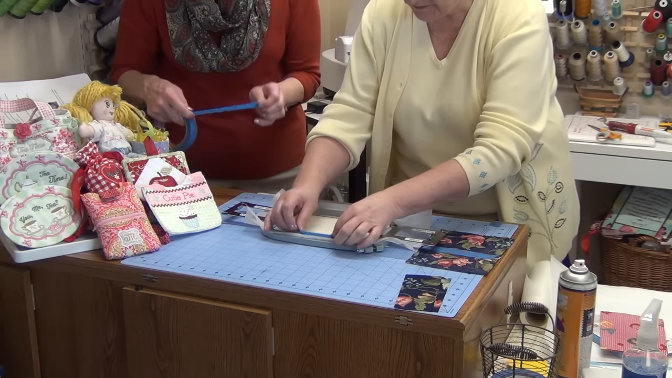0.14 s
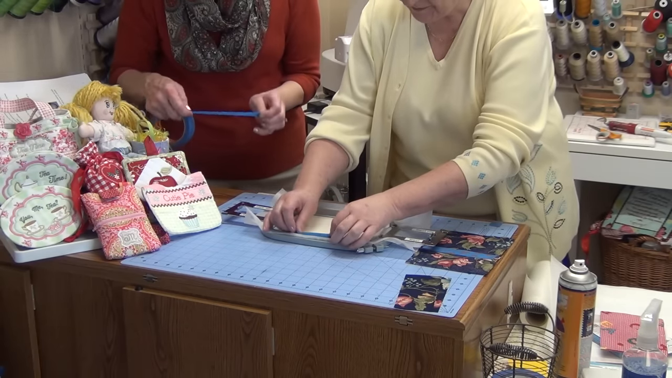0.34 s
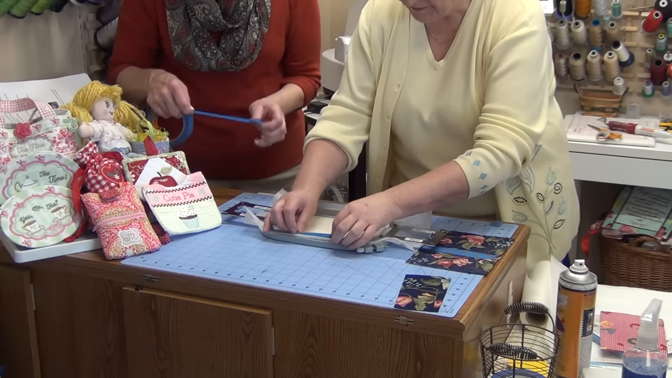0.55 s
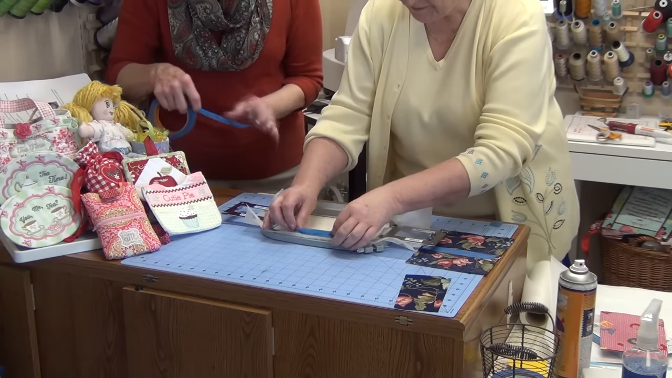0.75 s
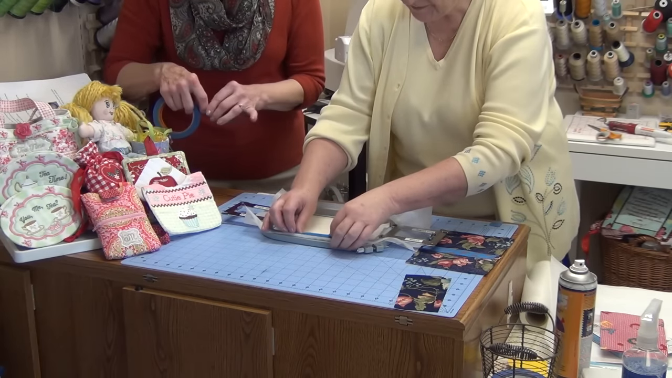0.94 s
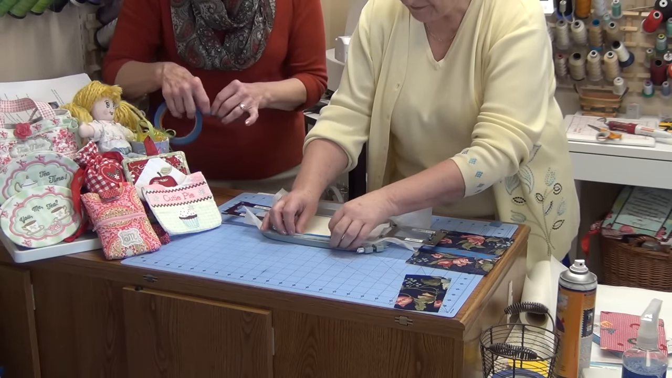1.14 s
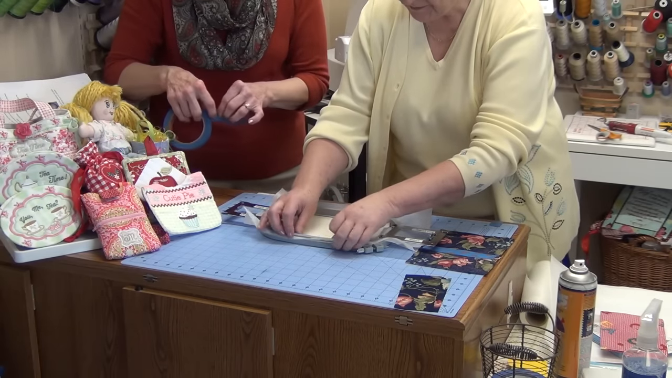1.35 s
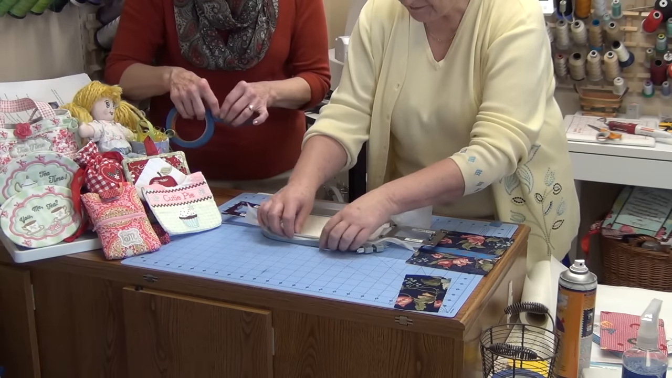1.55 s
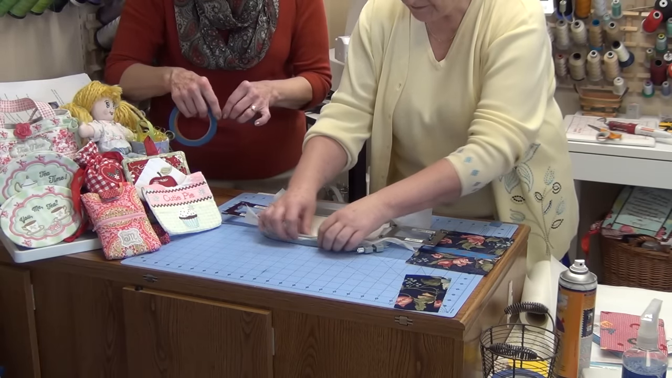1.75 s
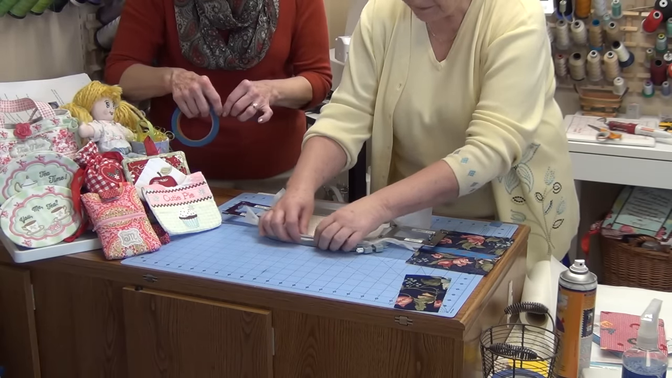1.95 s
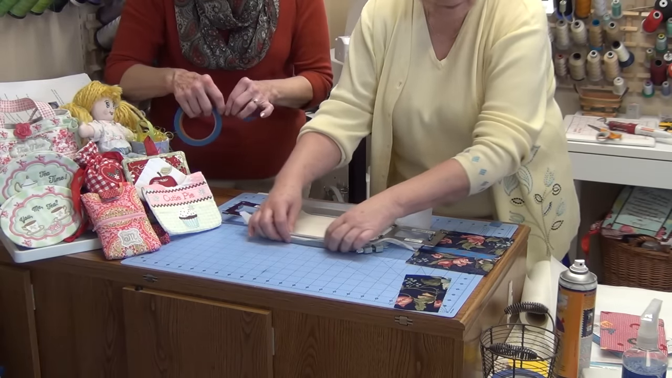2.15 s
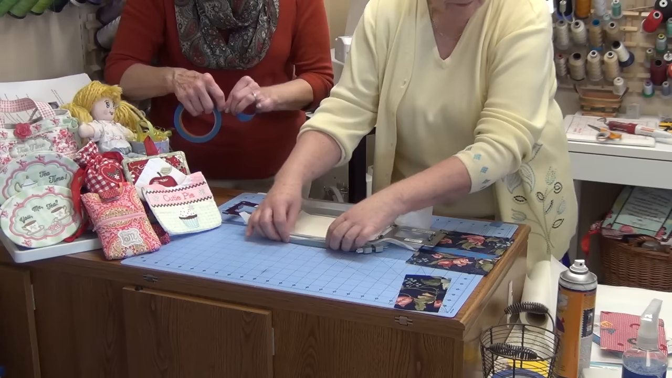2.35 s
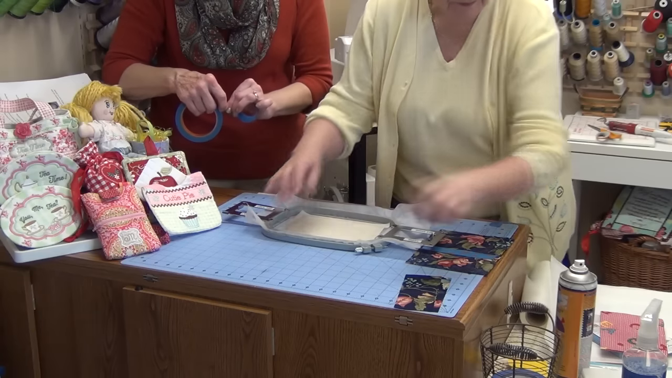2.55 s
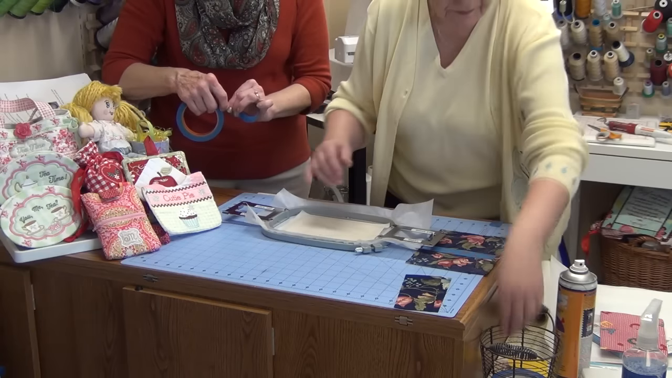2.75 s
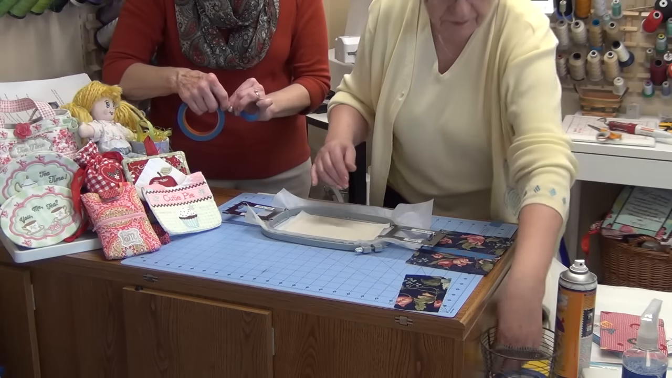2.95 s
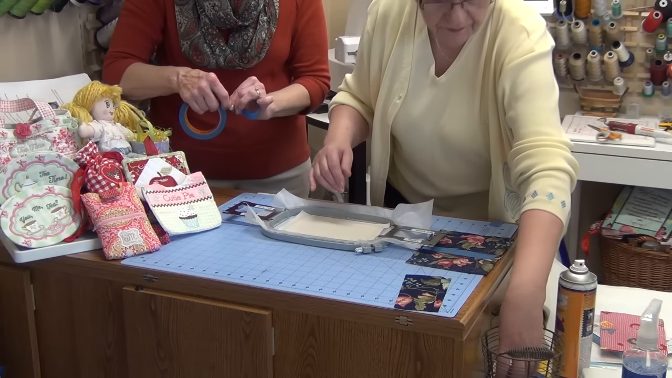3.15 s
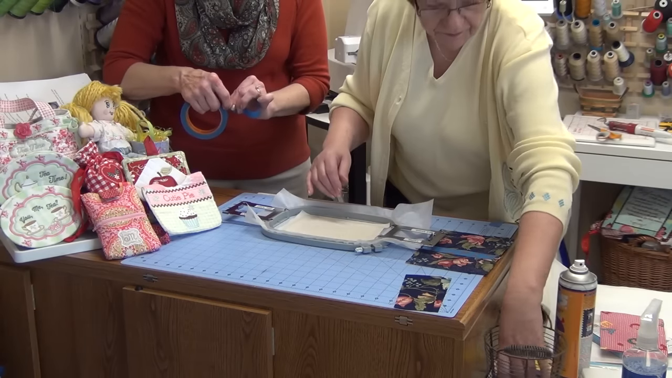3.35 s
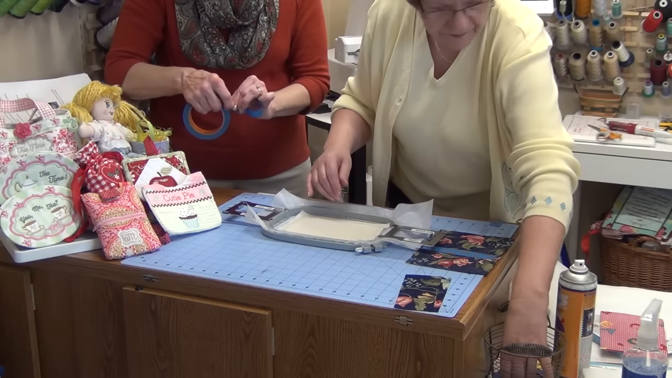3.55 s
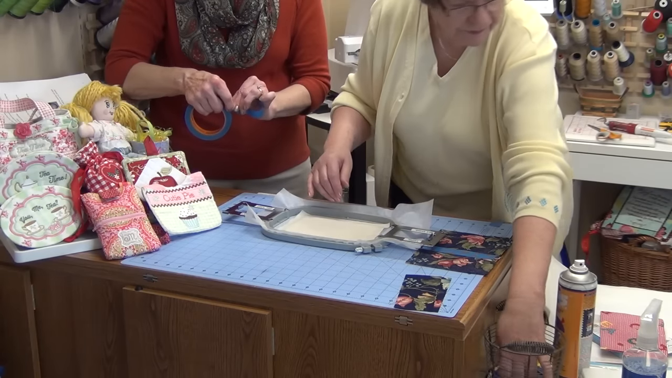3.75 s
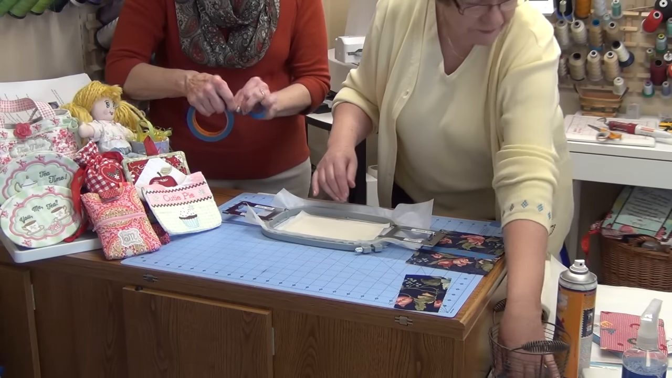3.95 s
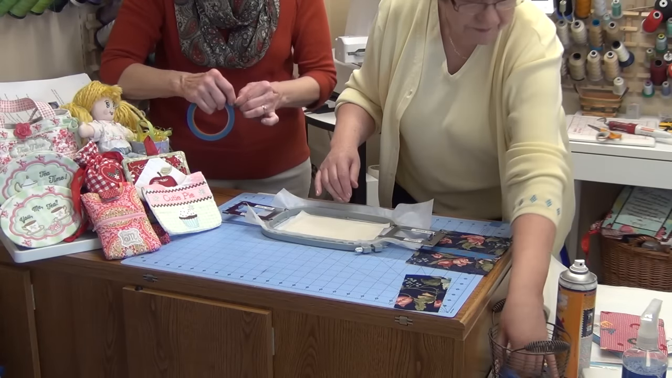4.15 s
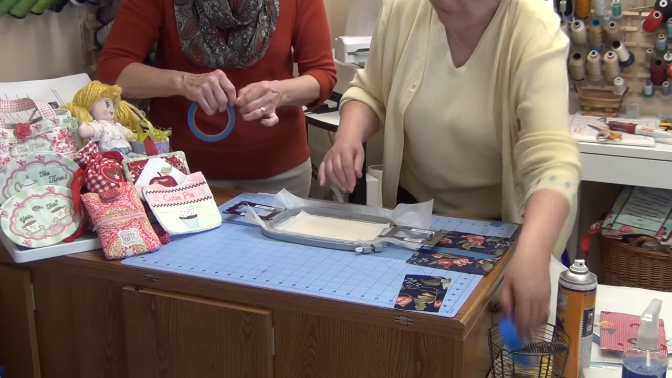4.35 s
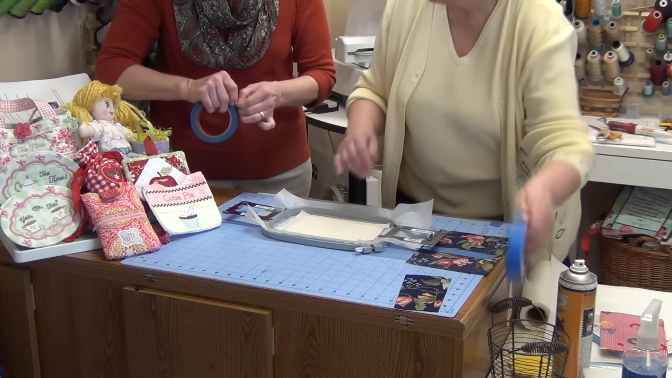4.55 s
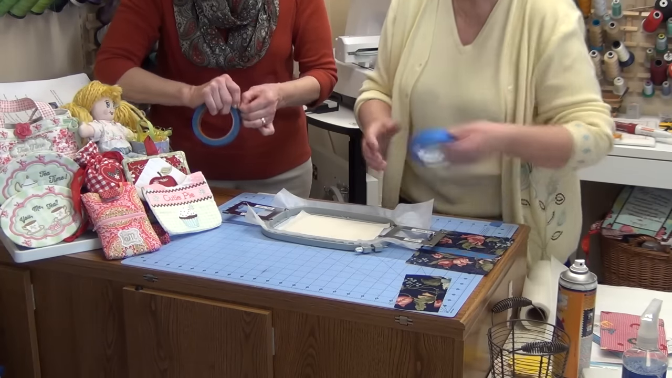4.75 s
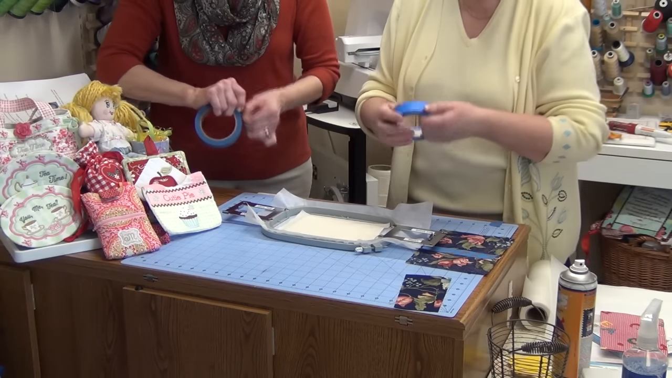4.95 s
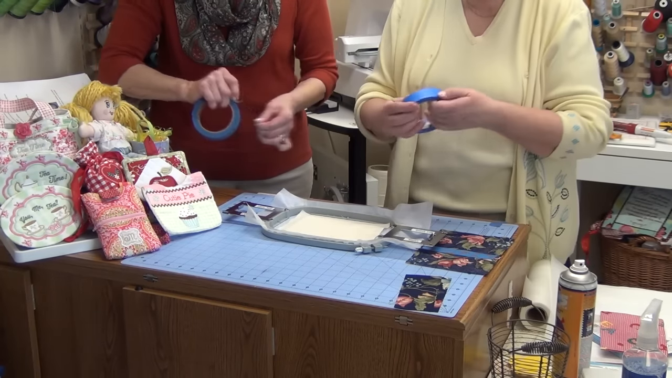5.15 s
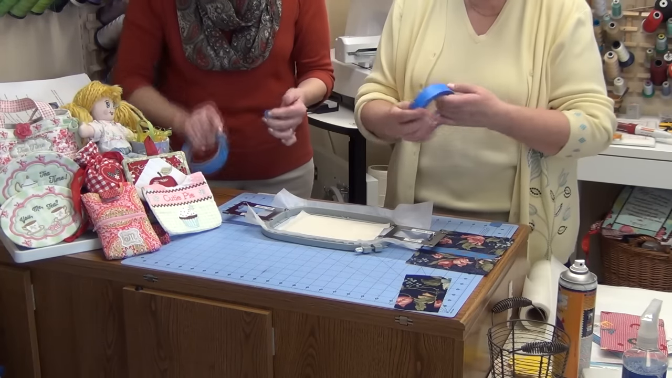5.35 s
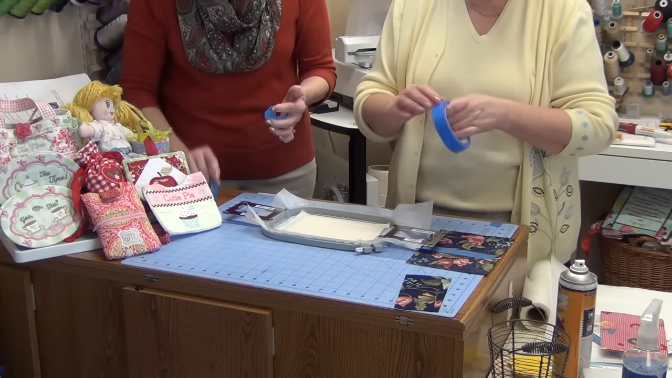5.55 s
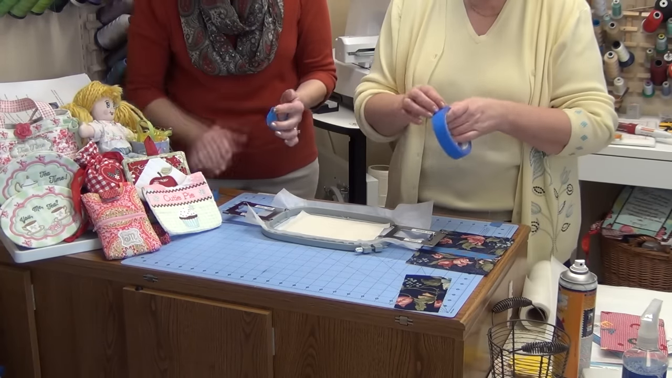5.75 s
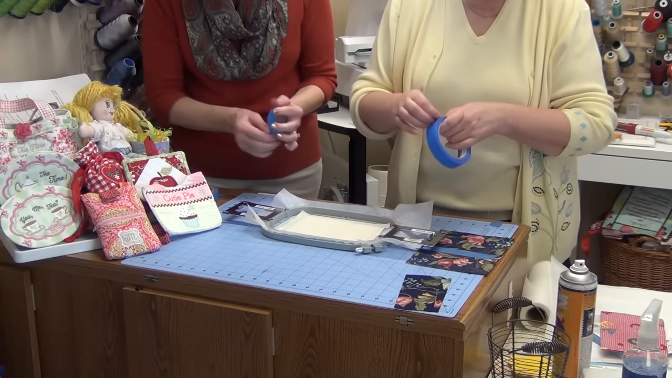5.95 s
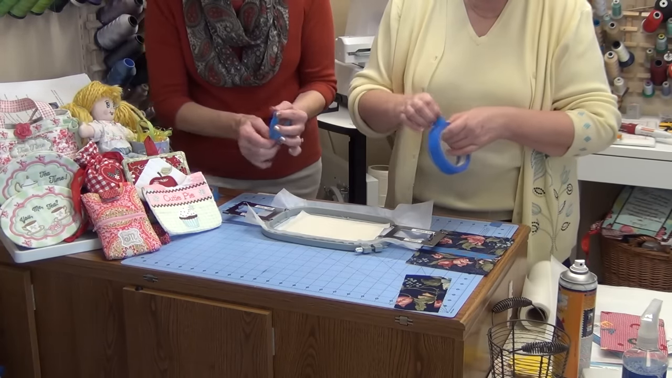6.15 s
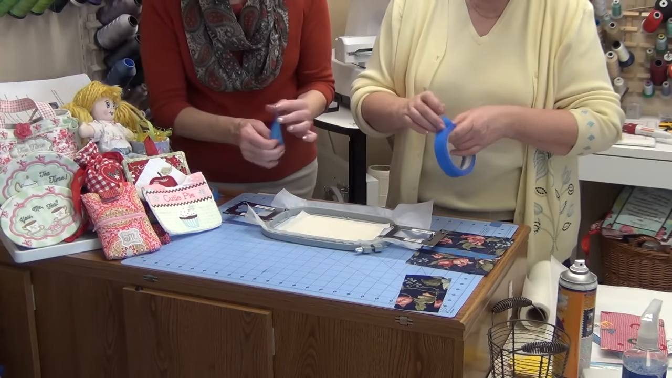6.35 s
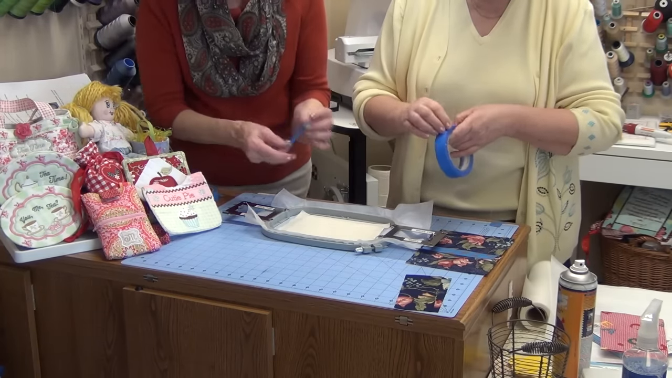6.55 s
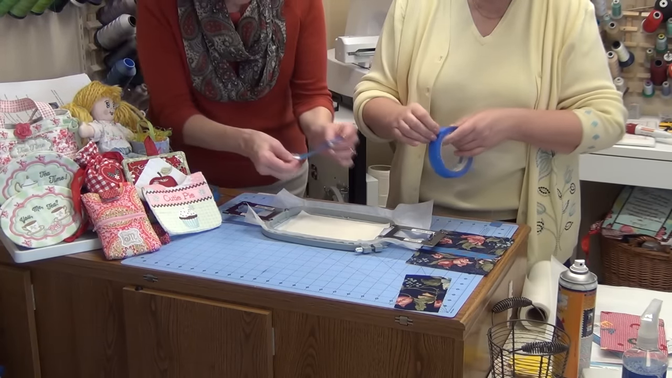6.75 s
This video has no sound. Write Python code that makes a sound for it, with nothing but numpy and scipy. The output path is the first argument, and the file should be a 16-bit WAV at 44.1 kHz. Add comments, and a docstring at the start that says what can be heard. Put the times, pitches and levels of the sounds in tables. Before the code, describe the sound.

Close, dry workroom with steady hiss, low hum and a very thin high whine. Tiny dry snaps of tape and fingernails come irregularly over very faint smoothing rustles. A hand then scrapes softly in a wire basket with small metallic ticks. A brief bright tape rip follows, then a tape roll bumps the wooden table, ending in one far louder knock. Afterwards come more crisp snaps and faint peeling.

```python
"""Painter's tape is picked, pressed, peeled and torn at a craft table in a small, well-damped room.
Snaps of tape and nails and short basket crackles are resonant noise bursts; tape peels by stick-slip.
Rolls knock on a wooden table, modelled as a filtered crack with decaying modes. A hand in a wire basket
scrapes by stick-slip through the basket's resonances, and its wires ring as decaying sines.
Rumble and hiss of filtered noise, a mains hum of sines and a blanked monitor whine lie underneath."""
import sys
import numpy as np
from scipy import signal
from scipy.fft import rfft, irfft, next_fast_len
from scipy.io import wavfile
from scipy.ndimage import uniform_filter1d

SR = 44100
rng = np.random.default_rng(int(sys.argv[2]) if len(sys.argv) > 2 else 0)


def inscribe(sig):
    """Save sig as 16-bit PCM at rate SR to the path in sys.argv[1].

    A 1-D sig is mono; a 2-D sig holds one channel per row.
    Samples are clipped to [-1, 1] before scaling.
    """
    pcm = np.round(np.clip(np.atleast_2d(sig).T, -1, 1) * 32767)
    wavfile.write(sys.argv[1], SR, pcm.astype(np.int16))


N = 300012
TIME = np.arange(N) / SR
SHORT = TIME[:SR // 2]   # time axis of a single event

# Snaps of tape and fingernails, and short crackles from the jogged basket. Each row: start in seconds,
# relative level in dB, ring frequency in Hz, ring level in dB, body level in dB,
# time constant of the crackle in ms.
SNAPS_AND_CRACKLES = [(0.1795, -28, 10300, 3, 8.5, 1.15), (0.591, -28.5, 7500, 6.5, -17, 3.1),
                      (0.6714, -35.5, 5530, 7, 9, 1.5), (1.1917, -29.5, 3500, -6, 24, 0.17),
                      (1.1985, -23, 3100, -8, -4.5, 0.57), (1.2506, -31.5, 9000, 5, -7, .7),
                      (1.396, -32.5, 3000, -5, 9, 0.52), (1.5272, -25, 4500, -3, -3, .4),
                      (1.531, -18.5, 8800, 5, -17, 0.57), (1.5984, -21.5, 5500, -14, -16, 0.16),
                      (1.8108, -27.5, 7540, 7, 5, 0.53), (1.893, -28.5, 1800, 10, 6, 0.29),
                      (2.3276, -24.5, 2400, 12, -6, 0.81), (2.5062, -30.5, 4970, 4, 7, 0.9),
                      (2.7283, -29.5, 3050, 20, -15, 0.21), (2.7291, -28.5, 10000, 21, -10, .5),
                      (3.5602, -34.5, 7950, 0, -17, 5.1), (4.1226, -24, 4440, 3, 9, 3.2),
                      (4.623, -23, 6560, 2, 1, 0.45), (4.6461, -25.5, 6330, 12, -15, 0.93),
                      (5.2568, -31.5, 6940, 16, -13, .3), (5.3859, -35, 6260, 0, -18, 1.6),
                      (5.9379, -31, 6050, 13, 12, 0.19), (6.1434, -27.5, 3950, -5, -1, 0.21),
                      (6.151, -24, 7860, 19, -1, .5), (6.2935, -25, 8500, 4.5, -6, 1),
                      (6.4127, -30, 6500, 1, -1, .7), (6.426, -16, 7250, -11, -8, 0.25),
                      (6.5559, -23, 8700, 7, 6, 1.1)]
# Tape peeled, torn or smoothed down. Each row: start in seconds, length in seconds, relative level in dB,
# centre of the strip's broad resonance in Hz.
TAPE_STROKES = [(0.0, .058, -50.5, 8100), (0.332, .035, -55, 3450), (0.56, 0.087, -52, 8040),
                (1.348, 0.071, -49, 4350), (1.535, 0.03, -45, 5900), (1.632, 0.096, -56, 4340),
                (1.744, 0.16, -49.5, 6100), (1.992, 0.2, -52, 5070), (2.168, .13, -50, 4770),
                (2.332, .061, -52, 5500), (2.418, .086, -47.5, 4900), (5.015, 0.038, -35, 7200),
                (5.026, 0.018, -28.5, 8500), (5.042, 0.075, -28.5, 7900), (5.108, 0.036, -44, 8000),
                (6.213, 0.061, -37.5, 6750), (6.26, 0.066, -44, 7000), (6.439, .09, -51, 7560),
                (6.555, 0.044, -46, 7540), (6.626, .16, -47.5, 8300)]
# Colour of the moving tape. Each row: frequency in Hz, gain in dB.
TAPE_COLOUR = [(150, -15), (700, -11.5), (2000, 1.5), (4000, -1), (8000, -9), (11000, -9), (15000, -2)]
SLIPS_PER_S = 2000   # rate of the fine slips in the tape strokes and the dry hiss of the basket
POPS_PER_S, POP_DB = 110, -11   # whole bundles of fibres giving way at once; level against the slips

# Dull knocks on table and basket. Each row: start in seconds, relative level in dB,
# lowpass corner of the soft contact in Hz, thud level in dB, relative room level in dB.
KNOCKS = [(1.6006, -34.5, 426, -2, -12), (1.894, -38, 1900, -11, -18), (3.134, -35.5, 1610, 13, -2),
          (3.563, -31.5, 1370, 7.5, 1.5), (4.122, -30, 1520, -18, -16), (4.156, -34.5, 2440, -15, 10.5),
          (4.272, -45, 915, 15, 1.5), (5.569, -25, 740, -12, -4.5), (5.619, -25, 2360, 3, -0.5),
          (5.6206, -18, 795, 1, -6.5), (5.7542, -2.6, 4400, 0, 0)]
# Modes of the wooden table. Each row: frequency in Hz, relative level in dB, 60 dB decay time in seconds.
TABLE_MODES = [(89.5, -16, 0.32), (128.6, -10, 0.49), (240, -8.5, 0.17), (323, -2.5, 0.11), (531, 1, 0.069),
               (689, -5.5, 0.19), (877.5, 14.5, 0.092), (936, 0, 0.11), (1030, -9, 0.28), (1227, 3, 0.17),
               (1485, -1, 0.13), (1700, -9, .14), (1900, -6, 0.081), (2240, -14, 0.072), (2640, -7, .13)]
# Spectrum of the first crack of a knock. Each row: frequency in Hz, gain in dB.
CRACK_COLOUR = [(60, -19.5), (200, -6), (500, -3.5), (900, 5.5), (2000, 7), (3000, 4), (4500, 0),
                (5500, -10), (7000, -3), (11000, -32)]
# What the room returns of a knock. Each row: frequency in Hz, gain in dB.
KNOCK_ROOM_COLOUR = [(80, 6), (250, -3.5), (380, -5.5), (550, 8), (750, 2.5), (950, -3), (1300, -5),
                     (2000, -8.5), (3000, -13), (5000, -6.5)]

# Shoves of the hand in the basket. Each row: start in seconds, length in seconds, relative level in dB,
# scratchiness as gain of the upper part of the force in dB, dry hiss level in dB.
SHOVES = [(2.931, 0.15, -43.5, 9, -14.5), (3.386, 0.11, -48.5, -5, -22), (3.479, 0.16, -47.5, -9, -12.5),
          (3.688, 0.094, -51.5, 6, -8), (3.79, 0.054, -45, -3, -8), (3.927, 0.053, -42.5, 9, -6.5),
          (4.06, 0.013, -44, 0, -10), (4.125, 0.037, -36, 8, -9), (4.253, 0.051, -37, -12, -14),
          (4.319, 0.084, -42.5, -24, -31)]
# Resonances of the basket and its contents. Each row: frequency in Hz, bandwidth in Hz, gain in dB.
BASKET_RESONANCES = [(324, 34, -1.5), (450, 64, -6.5), (603, 31, -3), (720, 76, -3), (902, 65, 1),
                     (1156, 200, -7), (1450, 150, -5.5), (1800, 450, -10), (3030, 530, -11.5)]
SHOVE_ATTACK_S = 0.0095
SHOVE_SETTLE_DB_PER_S, HISS_SETTLE_DB_PER_S = 135, 400   # the contents shift on after the hiss has stopped
SCRAPE_HZ, SCRAPE_WIDTH_HZ = 3780, 3700   # band of the dry hiss
# The wire basket is jogged. Each row: start in seconds, relative level in dB.
CLINKS = [(3.089, -48.5), (3.513, -46), (3.561, -56), (4.065, -51), (4.1241, -26.5), (4.132, -48),
          (4.28, -41.5)]
# Modes of the wires. Each row: frequency in Hz, relative level in dB, 60 dB decay time in seconds.
WIRE_MODES = [(2685, 2, 0.11), (2700, -7, 0.13), (3180, 5, 0.082), (3440, 0, 0.12), (3560, -2, 0.079),
              (4620, 0.5, 0.064), (4740, -11, .07), (8850, -6.5, .1), (10600, -25, .06)]

# Reverberation of the room. Each row: frequency in Hz, 60 dB decay time in seconds.
ROOM_T60 = [(100, 0.13), (260, 0.25), (700, 0.13), (2000, 0.16), (5000, 0.092), (14000, 0.064)]

# Low rumble of moving bodies, rising as the roll is lifted out of the basket.
# Each row: time in seconds, level in dB.
RUMBLE_LEVEL = [(0.0, -77), (3.8, -65), (4.1, -56.5), (4.7, -43), (4.95, -52.5), (6.35, -52.5),
                (6.6, -50.5), (6.85, -44)]
# Colour of the rumble. Each row: frequency in Hz, gain in dB.
RUMBLE_COLOUR = [(10, -23), (20, -2.5), (28, 4), (38, -22), (70, -11.5), (150, -38), (400, -64)]
# Colour of the steady room noise and hiss. Each row: frequency in Hz, relative density in dB.
FLOOR_COLOUR = [(20, -1), (100, -0.5), (280, -1), (600, -3.5), (1400, -7), (2200, -10.5), (4000, -13.5),
                (7000, -14), (10000, -13), (13000, -11.5), (14800, -7.5), (15800, -9.5)]
FLOOR_DB = -49.5   # rms
# Electrical hum and faint tones. Each row: frequency in Hz, rms level in dB.
HUM = [(60, -57), (120, -55), (180, -74), (240, -73.5), (300, -70.5), (1010.5, -64), (7867, -72.5),
       (8878, -72.5)]
LINE_HZ, SECOND_LINE_HZ, FIELD_HZ = 15734.3, 15747.3, 59.94   # the two tones of the whine, and field rate
# Colour of the faint hiss that differs between the channels. Each row: frequency in Hz, gain in dB.
SIDE_COLOUR = [(20, -22), (70, -22), (200, 4.5), (600, 4), (2000, -8), (8000, 8), (13000, 4), (15000, -25)]
CUTOFF_HZ = 15770


def snaps(crackle_db, ring_q, trim_db):
    """Impulsive release: a click and a quickly dying crackle, coloured by a resonance and a duller body."""
    out = np.zeros(N)
    t = SHORT[:2048]
    for s, level_db, ring_hz, ring_db, body_db, dying_ms in SNAPS_AND_CRACKLES:
        force = from_db(crackle_db) * rng.standard_normal(len(t)) * np.exp(-t * 1000 / dying_ms)
        force[0] = 1   # the release itself
        sound = band(force, [2000, 7500], "band", order=1)
        sound += from_db(body_db) * band(force, [250, 1900], "band", order=1)
        sound += from_db(ring_db) * resonate(force, ring_hz, ring_hz / ring_q)
        # a longer crackle carries more energy
        add(out, s, from_db(level_db + trim_db) * unit_energy(sound) * np.sqrt(1 + dying_ms))
    return out


def tape_strokes(spread_db, hiss_db, ring_db, ring_q, sing_db, edge_share):
    """Stick-slip excitation of a resonator: clumped slips drive one broad band with a narrow crest."""
    out = np.zeros(N)
    for s, length, level_db, ring_hz in TAPE_STROKES:
        force = slips(len(SHORT), SLIPS_PER_S, spread_db)
        force = force + from_db(hiss_db) * rng.standard_normal(len(SHORT))
        force = force + from_db(POP_DB) * slips(len(SHORT), POPS_PER_S, spread_db=-2.5)
        force = force * clumps(per_s=350, depth_db=1.5)
        sound = colour(force, TAPE_COLOUR)
        sound = sound + from_db(ring_db) * resonate(force, ring_hz, ring_hz / ring_q)
        sound = sound + from_db(sing_db) * resonate(force, ring_hz * 0.88, ring_hz / 10)   # narrow crest
        swell = np.clip(np.minimum(SHORT, length - SHORT) / (edge_share * length), 0, 1)
        add(out, s, from_db(level_db) * rms_one(sound) * swell)
    return out


def slips(count, per_s, spread_db):
    """Stick-slip friction: tiny releases at random moments, of uneven size and either sign."""
    sizes = from_db(spread_db * np.minimum(rng.exponential(1, count), 4))
    sizes = sizes * rng.choice([-1, 1], count)
    return rms_one(sizes * (rng.random(count) < per_s / SR))


def clumps(per_s, depth_db):
    """Random amplitude modulation: an uneven grip makes the gain wander many times a second."""
    count = 512
    return from_db(depth_db * np.interp(SHORT * per_s, np.arange(count), rng.standard_normal(count)))


def knocks(modes_db, tail_db, thud_hz, echo_hz, trim_db):
    """Impact excitation: a soft contact gives a short crack, rings the table's modes and wakes the room."""
    out = np.zeros(N)
    click = 1. * (SHORT == 0)
    crack = unit_energy(colour(click, CRACK_COLOUR))
    # bending waves spread the crack over a few cycles
    crack = crack - 2 * resonate(crack, 2180, 540)
    # two duller, weaker echoes off nearby surfaces
    delayed = np.roll(crack, round(.0019 * SR)) + np.roll(crack, round(.0042 * SR))
    echoes = .55 * band(delayed, echo_hz, "low")
    for s, level_db, soft_hz, thud_db, room_db in KNOCKS:
        direct = crack + echoes + from_db(modes_db) * unit_energy(struck(TABLE_MODES, chance_db=1.8))
        reverberant = signal.fftconvolve(crack, room_tail(build_ms=25))[:len(SHORT)]
        tail = unit_energy(colour(reverberant, KNOCK_ROOM_COLOUR))
        blow = direct + from_db(room_db + tail_db) * tail
        blow = blow + from_db(thud_db) * band(blow, thud_hz, "low", order=1)
        # the level refers to the peak of the softened direct sound
        height = np.abs(band(direct, soft_hz, "low", order=3)).max()
        add(out, s, from_db(level_db + trim_db) * band(blow, soft_hz, "low", order=3) / height)
    return out


def struck(modes, chance_db):
    """Modal decay: damped sines, among which each blow shares its force a little differently."""
    sound = 0
    for k, (hz, db, t60) in enumerate(modes):
        decay = from_db(db + rng.normal(0, chance_db) - 60 * SHORT / t60)
        sound = sound + decay * np.sin(2 * np.pi * hz * SHORT) * (-1) ** k
    return sound


def rummage(per_s, spread_db, split_hz, trim_db):
    """Friction-driven resonance: shoved things scrape in the basket; its body is heard through the room."""
    out = np.zeros(N)
    room = room_tail(build_ms=6.8)
    for s, length, level_db, scratch_db, hiss_db in SHOVES:
        force = slips(2 * len(SHORT), per_s, spread_db)
        dull = band(force, split_hz, "low", order=1)
        force = dull + from_db(scratch_db) * (force - dull)
        body = 0
        for k, (hz, width_hz, db) in enumerate(BASKET_RESONANCES):
            body = body + from_db(db) * resonate(force, hz, width_hz) * (-1) ** k
        body = band(band(body, 230, "high"), 1900, "low")
        body = signal.fftconvolve(body, room, "valid")[:len(SHORT)]
        # even out the level, so that the push of the hand sets the loudness
        body = body / np.sqrt(np.abs(uniform_filter1d(body ** 2, size=2600)) + 1e-12)
        friction = slips(len(SHORT), SLIPS_PER_S, spread_db=2.5)
        hiss = from_db(hiss_db) * rms_one(resonate(friction, SCRAPE_HZ, SCRAPE_WIDTH_HZ))
        sound = body * push(length, SHOVE_SETTLE_DB_PER_S) + hiss * push(length, HISS_SETTLE_DB_PER_S)
        add(out, s, from_db(level_db + trim_db) * sound)
    return out


def push(length, settle_db_per_s):
    """Envelope of a driven source: a shove builds up, holds and then settles exponentially."""
    return np.clip(SHORT / SHOVE_ATTACK_S, 0, 1) * from_db(-settle_db_per_s * np.maximum(SHORT - length, 0))


def clinks(trim_db):
    """Free vibration: thin wires ring briefly in their own modes."""
    out = np.zeros(N)
    for s, level_db in CLINKS:
        add(out, s, from_db(level_db + trim_db) * struck(WIRE_MODES, chance_db=3.0))
    return out


def near_table(x, echo_ms, echo_db, room_db):
    """Superposition of paths: directly from the source, off the table top and through the room."""
    echo = np.roll(x, round(echo_ms * SR / 1000))
    reverberant = signal.fftconvolve(x, room_tail(build_ms=5.5))[:N]
    return x + from_db(echo_db) * echo + from_db(room_db) * reverberant


def room_tail(build_ms):
    """Diffuse reverberation: dense echoes build up and then die, each band at its own rate."""
    edges, tail = np.geomspace(60, 16000, num=9), 0
    for low, high in zip(edges, edges[1:]):
        noise = band(rng.standard_normal(len(SHORT)), [low, high], "band")
        tail = tail + noise * from_db(-60 * SHORT / at_hz(ROOM_T60, np.sqrt(low * high)))
    return unit_energy(tail * (1 - np.exp(-SHORT * 1000 / build_ms)))


def background():
    """Stationary noise and steady tones: room noise and hum, with the swelling rumble of movement."""
    hiss = from_db(FLOOR_DB) * rms_one(colour(rng.standard_normal(N), FLOOR_COLOUR))
    hum = 0
    for hz, db in HUM:
        hum = hum + np.sqrt(2) * from_db(db) * np.sin(2 * np.pi * (hz * TIME + rng.random()))
    rumble = level_curve(RUMBLE_LEVEL) * rms_one(colour(rng.standard_normal(N), RUMBLE_COLOUR))
    return hiss + hum + rumble


def whine(line_db, second_db, blank_share, lag):
    """Beating: a monitor's line tone, blanked briefly in every field, against a second; lag in radians."""
    lit = (TIME * FIELD_HZ + .4) % 1 > blank_share
    beat_peak_s = .048   # a moment when both tones are in phase
    phase = 2 * np.pi * (TIME - beat_peak_s)
    shift = lag * np.array([[.5], [-.5]])   # the channels lie apart by the lag
    line = from_db(line_db) * lit * np.cos(LINE_HZ * phase + shift)
    second = from_db(second_db) * np.cos(SECOND_LINE_HZ * phase + shift)
    return np.sqrt(2) * (line + second)


def from_db(db):
    """Logarithmic level: decibels to amplitude gain."""
    return 10 ** (np.asarray(db) / 20)


def rms_one(x):
    """Effective value: scale to rms 1."""
    return x / np.sqrt(np.mean(x ** 2) + 1e-20)


def unit_energy(x):
    """Signal energy: scale to that of a unit click."""
    return x / np.sqrt(np.sum(x ** 2) + 1e-20)


def at_hz(points, hz):
    """Logarithmic pitch axis: interpolate a table over log frequency."""
    f, value = np.transpose(points)
    return np.interp(np.log(np.maximum(hz, 1)), np.log(f), value)


def level_curve(rows):
    """Envelope: gain over time, interpolated in decibels and silent outside the rows."""
    s, db = np.transpose(rows)
    return from_db(np.interp(TIME, s, db, left=-120, right=-120))


def add(track, s, sound):
    """Superposition: mix a sound into the track at a time in seconds."""
    start = int(np.clip(round(s * SR), 0, N - 1))
    track[start:start + len(sound)] += sound[:N - start]


def band(x, hz, kind, order=2):
    """Band limitation: Butterworth filter with a maximally flat passband."""
    sos = signal.butter(order, np.clip(hz, 10, .47 * SR), kind, fs=SR, output="sos")
    return signal.sosfilt(sos, x + 1e-18)


def resonate(x, hz, width_hz):
    """Damped resonance: a pole pair whose radius sets the bandwidth, with gain 1 on top."""
    r = np.exp(-np.pi * width_hz / SR)
    numerator = np.array([1, 0, -1]) * (1 - r * r) / 2
    denominator = [1, -2 * r * np.cos(2 * np.pi * hz / SR), r * r]
    return signal.lfilter(numerator, denominator, x + 1e-18)


def colour(x, spectrum):
    """Minimum phase: a causal filter whose gain follows a table of Hz and dB."""
    size = 2 * next_fast_len(len(x) // 2 + 1)
    cepstrum = irfft(np.log(from_db(at_hz(spectrum, np.fft.rfftfreq(size, 1 / SR)))))
    # folding the cepstrum onto positive times makes the filter causal
    cepstrum[1:size // 2] *= 2
    cepstrum[size // 2 + 1:] = 0
    return irfft(rfft(x, size) * np.exp(rfft(cepstrum)))[:len(x)]


def scene():
    """Superposition: all sits in the centre; only a faint hiss and the whine differ between channels."""
    ticks = snaps(crackle_db=-6.5, ring_q=5.4, trim_db=8.0)
    ticks = near_table(ticks, echo_ms=2.8, echo_db=-1.5, room_db=-4.5)
    tape = tape_strokes(spread_db=3.0, hiss_db=2.5, ring_db=10.5, ring_q=0.87, sing_db=5.0, edge_share=0.22)
    tape = near_table(tape, echo_ms=3.3, echo_db=-13.0, room_db=-11)
    blows = knocks(modes_db=-2, tail_db=-1.0, thud_hz=297, echo_hz=2140, trim_db=1.5)
    basket = rummage(per_s=250, spread_db=4, split_hz=410, trim_db=-0.5) + clinks(trim_db=-7.5)
    side = from_db(-64.5) * rms_one(colour(rng.standard_normal(N), SIDE_COLOUR))
    tone = whine(line_db=-45, second_db=-50.7, blank_share=.08, lag=.2)
    return ticks + tape + blows + basket + background() + tone + np.array([side, -side])


def record(dry):
    """Band limitation: an elliptic lowpass cuts the top steeply."""
    return signal.sosfilt(signal.ellip(16, .1, 80, CUTOFF_HZ, fs=SR, output="sos"), dry)


dry = scene()
out = record(dry)
inscribe(out)
```